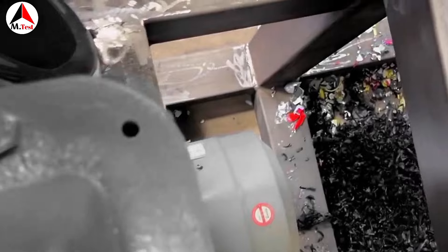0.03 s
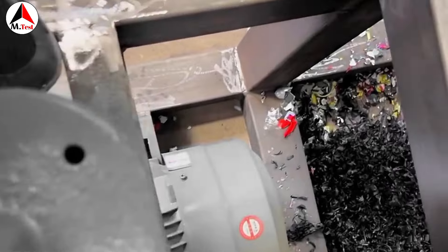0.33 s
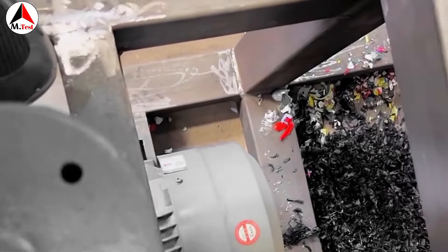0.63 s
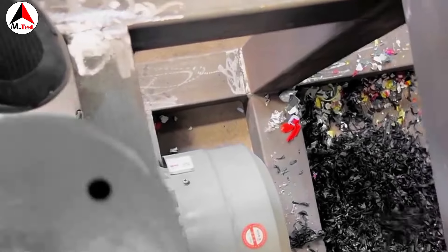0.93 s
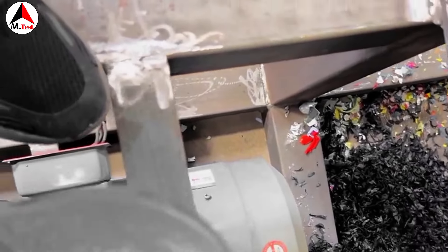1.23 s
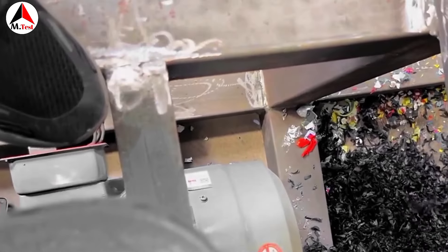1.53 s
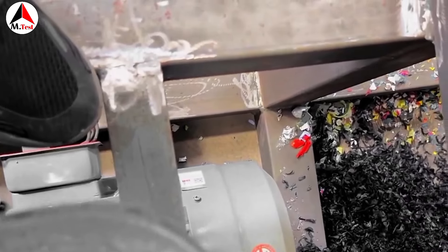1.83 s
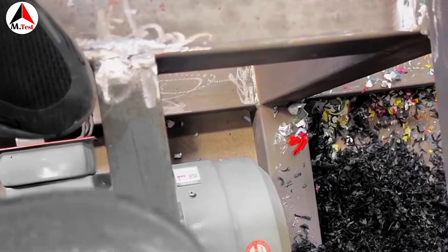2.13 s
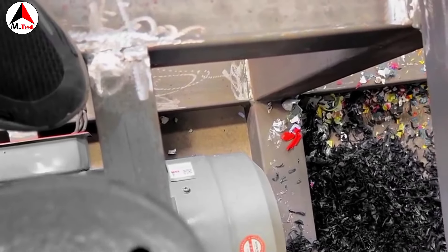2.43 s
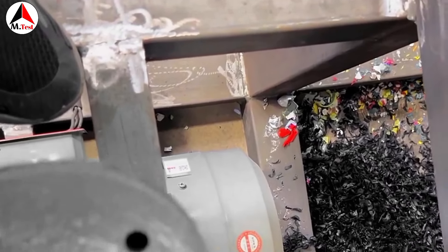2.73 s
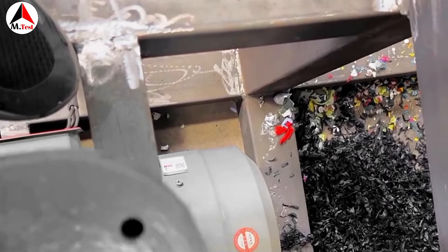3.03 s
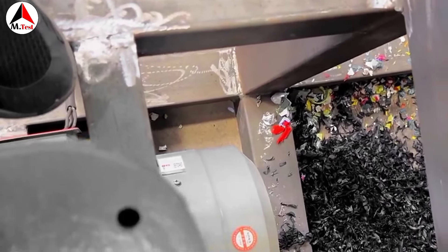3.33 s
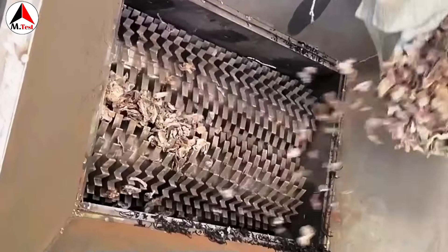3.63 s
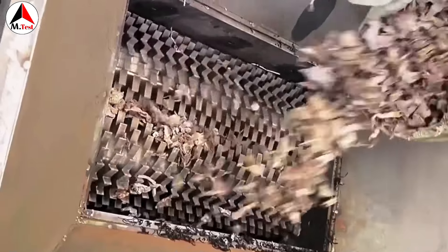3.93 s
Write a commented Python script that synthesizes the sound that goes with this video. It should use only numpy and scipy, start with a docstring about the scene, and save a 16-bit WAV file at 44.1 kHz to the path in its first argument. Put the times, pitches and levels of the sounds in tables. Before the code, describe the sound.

An industrial shredder runs close by with a deep rumble, wavering motor hum, gear tone and rattling steel. Irregular thuds come throughout as the cutters bite, while shreds trickle faintly, spilling most around 1.3 seconds. From about 3 seconds scrap squeaks on the blades, then gives a falling screech at 3.5. The sound breaks off near 3.7 seconds and quieter churning swells in at the hopper.

```python
"""An industrial shredder, the stereo microphone just above its motor and gearbox: a wavering hum,
a gear tone and a rattling steel frame. The cutters bite in uneven lurches and thud as the teeth break
through, shreds spill into the bin, and scrap squeaks and finally screeches against the blades.
The sound breaks off and swells back in, quieter, with the microphone at the hopper."""
import sys
import numpy as np
from scipy import signal
from scipy.io import wavfile
from scipy.ndimage import uniform_filter1d, minimum_filter1d

SR = 44100
rng = np.random.default_rng(int(sys.argv[2]) if len(sys.argv) > 2 else 0)


def wrap_up_sound(samples):
    """Save the sound to the file named by the first command line argument, as 16-bit audio."""
    columns = np.atleast_2d(samples).T
    # keep every value between -1 and 1, then stretch to whole-number steps
    tamed = np.clip(columns, -1, 1)
    steps = np.round(tamed * 32767).astype(np.int16)
    wavfile.write(sys.argv[1], SR, steps)


N = 176400
T = np.arange(N) / SR


# the motor's hum, just under the microphone: time_s, pitch_hz, level_db
MOTOR_HUM = [(0.0, 100.2, -8.5), (0.38, 83.9, -14), (0.46, 95, -10.5), (0.64, 94.8, -15.5),
             (0.77, 112.3, -16), (1.02, 99.8, -14), (1.27, 102.9, -17.5), (1.4, 113.9, -14.5),
             (1.65, 86.6, -21), (1.7, 102, -16), (2.36, 94.56, -20), (2.47, 82.25, -22.5),
             (2.59, 104.8, -15), (2.77, 114.2, -18.5), (2.87, 103, -13.5), (3.32, 109.5, -20),
             (3.44, 91.5, -24), (3.65, 90.8, -14.5)]
# spectrum of the drive's rumble: frequency_hz, density_db
RUMBLE_SPECTRUM = [(25, -13.5), (45, -6.5), (68, -1.5), (100, -2.5), (140, -3.5), (200, -6), (290, -14.5),
                   (460, -8.5), (640, -22.5), (860, -25.5), (1150, -27.5), (1700, -26.5), (2600, -34),
                   (4500, -44), (9500, -60)]

def drive(load_db, top_hz=2900, grind_from_hz=131):
    """A deep rumble, a grinding that swells under load, and the wavering hum of the motor."""
    noise = butterworth(banded_noise(RUMBLE_SPECTRUM, patchy_db=2), 2, top_hz, "low")
    deep = from_db(0.078 * load_db) * butterworth(noise, 3, grind_from_hz, "low")
    grinding = from_db(0.64 * load_db) * butterworth(noise, 3, grind_from_hz, "high")
    hz, db = in_time(MOTOR_HUM)
    hum = from_db(db - 2.5) * tone(hz, flutter=0.36, rate=16.4)
    return from_db(-15) * (deep + grinding) + hum


# the gearbox from close above: time_s, pitch_hz, level_db
GEAR_TONE = [(.03, 535, -30), (.09, 540, -23.5), (.29, 541, -19), (.34, 538.4, -29), (.42, 548, -21.5),
             (.465, 540, -38), (.505, 541, -17.5), (.95, 541, -20), (1.43, 542, -17), (1.48, 532, -24),
             (1.63, 534, -22.5), (1.7, 540, -18), (1.9, 538, -25.5), (2.0, 541.7, -20.5),
             (2.22, 541, -17.5), (2.27, 541, -26.5), (2.44, 541, -15), (2.78, 537, -21), (3.1, 542, -16.5),
             (3.41, 542, -16.5), (3.47, 538, -26), (3.55, 535, -30.5)]
# faint overtones of the gears: start_s, end_s, pitch_hz, level_db
GEAR_WHINES = [(.45, .9, 4540, -44.5), (1.0, 1.894, 4540, -52), (1.305, 2.896, 3826, -50)]

def gears(waver_hz=2.027, whine_fade_s=0.038):
    """The meshing tone on the right, its scatter off the frame and a thin whine that comes and goes."""
    hz, db = in_time(GEAR_TONE)
    hz = hz + waver_hz * drift(10.9)
    scatter = from_db(-9.5) * resonate(stereo_white(), 548.8, width_hz=31)
    meshing = pan(-14) * tone(hz, flutter=0.19, rate=31)
    out = from_db(db + 1.24) * (meshing + scatter)
    for start, end, pitch_hz, level_db in GEAR_WHINES:
        fade = np.clip(np.minimum(T - start, end - T) / whine_fade_s, 0, 1)
        out += from_db(level_db) * fade * resonate(stereo_white(), pitch_hz, width_hz=110)
    return out


# load between the bites, as the feed thickens and thins: time_s, load_db
FEED_LOAD = [(0, -1), (.15, -4), (.45, 1), (.9, -3), (1.01, -1.5), (1.2, -6.5), (1.42, -1.5), (1.63, -2),
             (1.87, -2.5), (2.1, -0.5), (2.3, -6), (2.5, 0.5), (2.8, -3.5), (2.92, -1.5), (3.2, -3.5),
             (3.47, 0), (3.65, 2)]
# the cutters bite: start_s, length_s, added_load_db
CUTTER_BITES = [(0.058, 0.026, 9.5), (0.226, 0.018, 11.5), (0.586, 0.036, 2), (0.667, 0.024, 3),
                (0.791, 0.039, 7), (1.047, 0.037, 5), (1.286, 0.2, 2.5), (1.557, 0.026, 3),
                (1.667, 0.041, 3), (1.997, 0.044, 0.5), (2.093, 0.028, 3.5), (2.434, 0.079, 3),
                (2.614, 0.024, -0.5), (2.728, 0.05, 5), (3.06, 0.036, 3.5), (3.187, 0.044, 5),
                (3.31, 0.044, -0.5), (3.54, 0.063, 2.5)]

def cutter_load(attack_s=0.003, release_s=0.025):
    """Load in dB: each bite rises quickly, holds and lets go."""
    load_db, = in_time(FEED_LOAD)
    for start, length, db in CUTTER_BITES:
        rise = np.clip((T - start) / attack_s + .5, 0, 1)
        release = np.exp(-np.maximum(T - start - length, 0) / release_s)
        load_db += db * rise * release
    return load_db


# resonances of the steel frame, heard close up: pitch_hz, width_hz, level_db
FRAME_MODES = [(151.9, 10, -29), (182, 120, -30), (236.7, 22, -32.5), (359.7, 24, -31.5), (459, 200, -34.5),
               (734.6, 28, -38), (795, 47, -38.5), (846, 21, -40.5), (872.5, 38, -38.5), (936, 21, -39),
               (1401, 22, -52.5), (1485, 16, -48), (1560, 23, -43), (1591, 41, -42), (1676, 47, -43),
               (1784, 17, -42), (1821, 35, -45.5), (1923, 160, -43.5), (2076, 160, -46.5), (2202, 39, -47)]

def frame_rattle(load_db, knocks_per_s=480):
    """Uneven knocks ring the frame, each mode with a new strength; low modes feel the load most."""
    knocks = (rng.random(N) < knocks_per_s / SR) * from_db(np.minimum(rng.exponential(1, N), 3))
    out = 0
    for hz, width_hz, db in FRAME_MODES:
        load_share = at_hz([(300, 1), (1600, 0.44)], hz)
        force = resonate(knocks * from_db(load_share * load_db) * stereo_white(), hz, hz / 2)
        mid, side = signal.lfilter([1, 0, -1], mode_poles(hz, width_hz), force)
        out += from_db(db + 3.5) * rms_one(stereo(mid, side, hz))
    return out


# heavy thuds as the teeth break through, near the centre: start_s, peak_db, pitch_hz
HOUSING_THUDS = [(.056, -6, 193.4), (.255, -9, 199), (.315, -11.5, 186), (.562, -7, 174), (.60, -14.5, 207),
                 (.82, -1.5, 177), (.845, -10, 161), (.88, -8.5, 197), (1.066, -8.5, 172),
                 (1.085, -17.5, 356.3), (1.126, -6.5, 189), (1.155, -10, 163), (1.204, -8, 126.4),
                 (1.28, -7, 194.4), (1.33, -10.5, 238), (1.331, -8, 353.5), (1.401, -11.5, 187.5),
                 (1.455, -18, 174), (1.59, -12.5, 174), (1.685, -15, 200), (1.745, -6.5, 151.3),
                 (2.008, -5.5, 147.3), (2.095, -8.5, 189.2), (2.149, -12, 233), (2.215, -10.5, 139.5),
                 (2.279, -12, 177), (2.462, -8, 179.2), (2.655, -15, 190.3), (2.728, -6, 171),
                 (2.85, -15, 164), (3.115, -11.5, 168.5), (3.19, -9, 238), (3.233, -13, 349),
                 (3.239, -16, 176), (3.29, -10, 145), (3.33, -6.5, 178.6), (3.38, -9, 228.6)]

def thuds(rise_s=0.0036, decay_s=0.035, clank_db=18.5):
    """Each thud is a short, damped thump of the housing, and its jolt makes the frame clank."""
    thumps, jolts = np.zeros(N), np.zeros(N)
    for start, db, hz in HOUSING_THUDS:
        age = np.maximum(T - start, 0)
        envelope = np.minimum(age / rise_s, 1) * np.exp(-np.maximum(age - rise_s, 0) / decay_s)
        thumps += from_db(db) * envelope * np.sin(2 * np.pi * hz * age + rng.uniform(0, 2 * np.pi))
        jolts[int(start * SR)] = from_db(db + clank_db)
    out = pan(1.5) * thumps
    struck = np.flatnonzero(jolts)
    for hz, width_hz, db in FRAME_MODES:
        force = np.zeros((2, N))
        force[:, struck] = jolts[struck] * rng.standard_normal((len(struck), 2)).T
        unit_ring = [0, np.sin(2 * np.pi * hz / SR)]  # a jolt of 1 rings with amplitude 1
        mid, side = signal.lfilter(unit_ring, mode_poles(hz, width_hz), force + 1e-18)
        out += from_db(db) * stereo(mid, side, hz)
    return out


# scrap squeaking on the blades: peak_s, attack_s, release_s, pitch_hz, level_db
SCRAP_SQUEAKS = [(2.962, 0.038, 0.058, 2720, -24), (2.967, .03, .03, 4930, -32),
                 (2.988, 0.02, 0.029, 4910, -28.5), (3.018, 0.023, .04, 4855, -27.5),
                 (3.05, .03, 0.05, 5150, -36), (3.183, 0.018, 0.022, 5230, -28.5),
                 (3.19, .025, 0.047, 5460, -35), (3.313, .04, .04, 4770, -28),
                 (3.328, 0.022, .016, 4730, -18.5), (3.352, 0.027, 0.03, 4726, -22),
                 (3.386, 0.032, 0.06, 4700, -28.5)]

def squeaks(sag_hz_per_s=900, jitter_hz=26.8, slips_per_s=100, fade_db=26):
    """Stick and slip: chattering whistles with a raspy upper mode swell, sag in pitch and fade."""
    out = 0
    for peak_s, attack_s, release_s, pitch_hz, db in SCRAP_SQUEAKS:
        age = T - peak_s
        hz = pitch_hz - sag_hz_per_s * age + jitter_hz * drift(78)
        slips = 1 + 0.25 * np.cos(2 * np.pi * slips_per_s * age + drift(43))
        whistle = np.array([tone(hz, flutter=0.91, rate=33) for _ in range(2)])
        noise, width_hz = stereo_white(), 0.06 * pitch_hz
        rasp = from_db(-11) * resonate(noise, pitch_hz, width_hz)
        upper_mode = from_db(-16.5) * resonate(noise, 1.84 * pitch_hz, width_hz)
        fade = np.maximum(-age / attack_s, age / release_s)
        out += from_db(db - fade_db * fade) * slips * (whistle + rasp + upper_mode)
    return out


# scrap screeching against the blades: time_s, pitch_hz, level_db
SCREECH_GLIDE = [(3.515, 4434, -55), (3.535, 4230, -31.5), (3.575, 3704, -29.5), (3.61, 3390, -31),
                 (3.65, 3120, -30.5), (3.7, 3115, -22)]
# blade modes that join the screech: start_s, pitch_hz, width_hz, level_db
BLADE_MODES = [(3.565, 6290, 260, -31), (3.565, 7150, 700, -36), (3.607, 5300, 260, -35),
               (3.607, 6580, 451, -31), (3.607, 9250, 500, -46)]

def screech(jitter_hz=(260, 85), octave_db=-7.5, chatter_db=3, blade_rise_s=0.0049):
    """A rough falling squeal steadies as it lands, with its octave and a rasp; the blades join in."""
    hz, db = in_time(SCREECH_GLIDE)
    onset_s, fall_s, landing_s = (SCREECH_GLIDE[row][0] for row in (0, 1, -2))
    hz = hz + np.interp(T, [fall_s, landing_s], jitter_hz) * drift(252.8)
    squeal = np.zeros((2, N))
    for channel in squeal:
        channel += tone(hz, flutter=1, rate=190)
        channel += from_db(octave_db) * tone(2 * hz, flutter=1, rate=190)
    rasp = from_db(-7) * resonate(stereo_white(), 6300, width_hz=6000)
    chatter = rms_one(from_db(chatter_db * drift(65)))
    out = from_db(db) * (T > onset_s) * (squeal * chatter + rasp)
    for start, pitch_hz, width_hz, level_db in BLADE_MODES:
        rise = np.clip((T - start) / blade_rise_s + .5, 0, 1)
        out += from_db(level_db) * rise * resonate(stereo_white(), pitch_hz, width_hz)
    return out


# hiss of sliding shreds, faint from above the motor: time_s, level_db
TRICKLE_LEVEL = [(0, -38.5), (.9, -39), (1.25, -41), (1.6, -42.5), (1.85, -43.5), (2.25, -42.5),
                 (2.6, -41.5), (3.1, -41), (3.65, -42)]
# spills into the bin: peak_s, peak_db, fall_db_per_s
SHRED_SPILLS = [(.01, -38, 100), (.06, -42, 104), (.232, -36.5, 106), (.642, -36, 201), (0.824, -37, 123),
                (1.085, -39.5, 147), (1.303, -29, 150), (1.324, -28, 109), (1.462, -32, 113),
                (1.675, -37.5, 238), (2.46, -33.5, 175), (3.183, -32.5, 304)]
# spectra of the trickle and the brighter spills: frequency_hz, density_db
TRICKLE_SPECTRUM = [(1500, -16.5), (2600, -2.5), (4200, 1), (5800, -4.5), (9500, -11)]
SPILL_SPECTRUM = [(1500, -6), (2600, -1), (4200, 2), (6000, -0.5), (9500, -3)]

def shreds(grain_db=1.6, crunch_db=2.5, rise_db_per_s=1797.5):
    """Shreds trickle all the time and now and then spill in a bright, grainy rush."""
    trickle_db, = in_time(TRICKLE_LEVEL)
    trickle = rms_one(banded_noise(TRICKLE_SPECTRUM, patchy_db=1.5) * from_db(grain_db * drift(200)))
    rush = rms_one(banded_noise(SPILL_SPECTRUM, patchy_db=2) * from_db(crunch_db * drift(350)))
    spill_power = 0
    for peak_s, peak_db, fall_db_per_s in SHRED_SPILLS:
        below_peak_db = np.maximum((peak_s - T) * rise_db_per_s, (T - peak_s) * fall_db_per_s)
        spill_power += from_db(peak_db - below_peak_db) ** 2
    return from_db(trickle_db) * trickle + np.sqrt(spill_power) * rush


# the swell with the microphone at the hopper: time_s, level_db
HOPPER_SWELL = [(3.70, -93), (3.745, -56), (3.757, -44), (3.775, -34), (3.86, -25.5), (3.93, -25),
                (3.97, -20), (4, -19)]
# spectrum of the churning there: frequency_hz, density_db
HOPPER_SPECTRUM = [(18, -43), (30, -11), (75, -0.5), (334, -17), (595, -12.5), (640, -19.5), (704, -15.5),
                   (1490, -27), (1600, -17.5), (1850, -20.5), (2600, -25.5), (9500, -43.5), (12400, -50),
                   (20900, -120)]

def hopper(start_s, fade_s=0.016):
    """The cutter shafts churning, fading in."""
    db, = in_time(HOPPER_SWELL)
    fade = np.clip((T - start_s) / fade_s, 0, 1)
    return from_db(db) * fade * banded_noise(HOPPER_SPECTRUM, patchy_db=2)


# likeness of the microphone's two channels: frequency_hz, correlation
MIC_LIKENESS = [(60, 1), (100, 3), (150, 0.97), (250, 0.75), (500, 0.38), (1000, 0.28), (2000, -0.08),
                (4000, 0.04), (9000, 0.08)]
# balance at the microphone: frequency_hz, left_minus_right_db
MIC_BALANCE = [(80, 1.2), (200, 1.7), (400, 2), (620, -0.5), (900, -0.75), (1400, -0.011), (4000, 0)]

def stereo(mid, side, hz):
    """Two unrelated signals as left and right, alike in the bass and diffuse above."""
    alike = np.clip(at_hz(MIC_LIKENESS, hz), -.999, .999)
    pair = np.sqrt(1 + alike) * mid + np.sqrt(1 - alike) * side * [[1], [-1]]
    return pan(at_hz(MIC_BALANCE, hz)) * pair


def pan(db):
    """Left and right gains of constant total power; positive leans left."""
    return rms_one(from_db([[db / 2], [-db / 2]]))


def banded_noise(spectrum, patchy_db):
    """Third-octave bands of stereo noise, each with a flicker of its own; rms 1."""
    edges = 22 * 2 ** (np.arange(28) / 3)
    white = rng.standard_normal((2, 2, N))
    out = 0
    for k, (low, high) in enumerate(zip(edges, edges[1:])):
        hz = np.sqrt(low * high)
        if high > spectrum[0][0] / 2:
            mid, side = butterworth(white[k % 2], 3, [low, high], "band")
            out += from_db(at_hz(spectrum, hz) + patchy_db * drift(9.2)) * stereo(mid, side, hz)
    return rms_one(out)


def tone(hz, flutter, rate):
    """A sine of rms 1 whose strength and phase flutter."""
    turn = np.exp(2j * np.pi * np.cumsum(hz) / SR)
    wobble = 1 + flutter * (drift(rate) + 1j * drift(rate))
    return rms_one(np.real(turn * wobble))


def drift(rate_hz, step=40):
    """Smooth random wandering with spread 1."""
    pole = np.exp(-2 * np.pi * step * rate_hz / SR)
    noise = rng.standard_normal(N // step + 2002)
    slow = signal.lfilter([1], [1, -2 * pole, pole * pole], noise)[2000:]
    return np.interp(np.arange(N) / step, np.arange(len(slow)), rms_one(slow))


def mode_poles(hz, width_hz):
    """Feedback coefficients of one damped mode."""
    radius = np.exp(-np.pi * width_hz / SR)
    return [1, -2 * radius * np.cos(2 * np.pi * hz / SR), radius * radius]


def resonate(x, hz, width_hz):
    """A resonance with steep skirts; rms 1."""
    edges = np.clip([hz - width_hz / 2, hz + width_hz / 2], 10, .45 * SR)
    return rms_one(butterworth(x + 1e-18, 2, edges, "band"))


def butterworth(x, order, hz, kind):
    """A filter with a flat passband."""
    return signal.sosfilt(signal.butter(order, hz, kind, fs=SR, output="sos"), x)


def stereo_white():
    """Two unrelated white noises."""
    return rng.standard_normal((2, N))


def in_time(rows):
    """Each column of a curve at every sample."""
    times, *columns = np.transpose(rows)
    return [np.interp(T, times, column) for column in columns]


def at_hz(points, hz):
    """Read a spectrum on a log-frequency axis."""
    frequencies, values = np.transpose(points)
    return np.interp(np.log(hz), np.log(frequencies), values)


def from_db(db):
    """Decibels to gain."""
    return 10 ** (np.asarray(db) / 20)


def rms_one(x):
    """Scale to rms 1."""
    return x / np.sqrt(np.mean(x ** 2) + 1e-20)


def scene(break_s=3.66, break_db_per_s=996):
    """The shredder from just above its drive, a sudden break, then at the hopper."""
    load_db = cutter_load()
    machine = drive(load_db) + gears() + frame_rattle(load_db) + thuds()
    scrap = shreds() + squeaks() + screech()
    break_off = from_db(-break_db_per_s * np.clip(T - break_s, 0, .2))
    return (machine + scrap) * break_off + hopper(break_s)


def record(dry):
    """A limiter holds the peaks; bass below 18 Hz and treble above 9800 Hz are cut."""
    dry = butterworth(dry, 2, 18, "high")
    safe_gain = np.minimum(1, .95 / (np.abs(dry).max(axis=0) + 1e-9))
    gain = uniform_filter1d(minimum_filter1d(safe_gain, size=400), size=400)
    return signal.sosfilt(signal.ellip(12, .2, 80, 9800, fs=SR, output="sos"), dry * gain)


dry = scene()
out = record(dry)
wrap_up_sound(out)
```